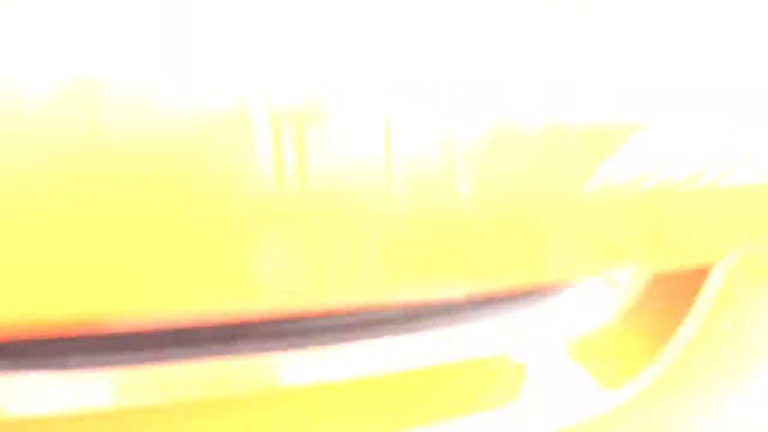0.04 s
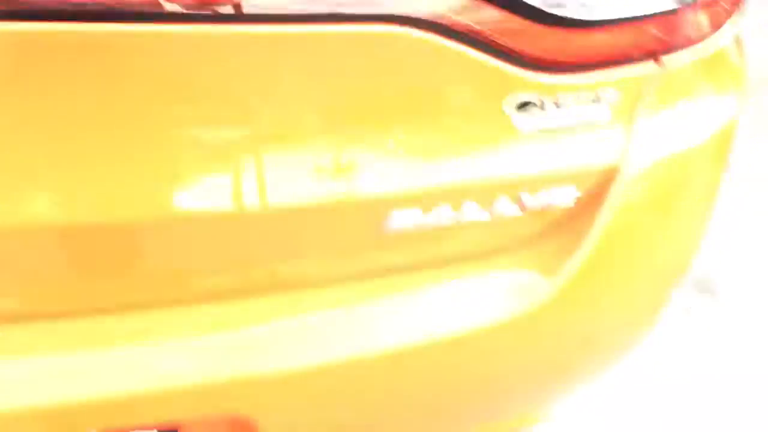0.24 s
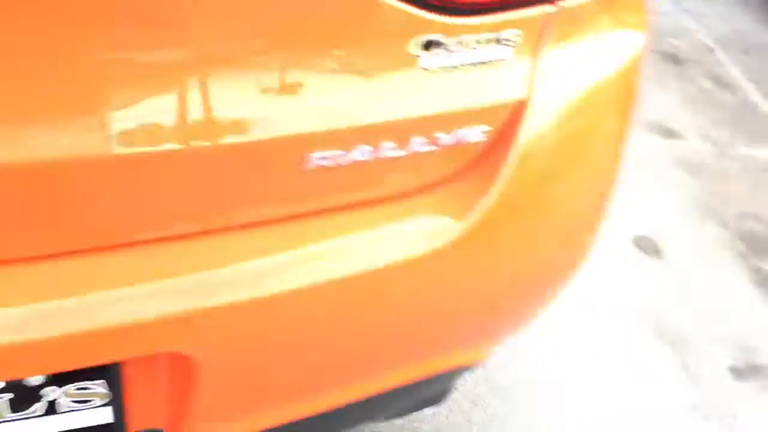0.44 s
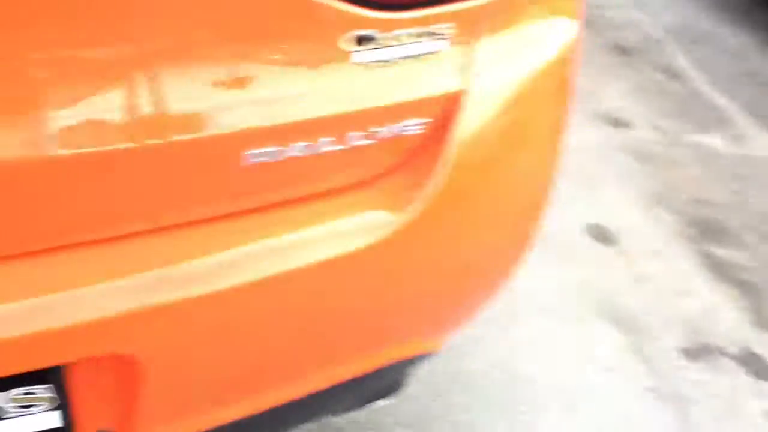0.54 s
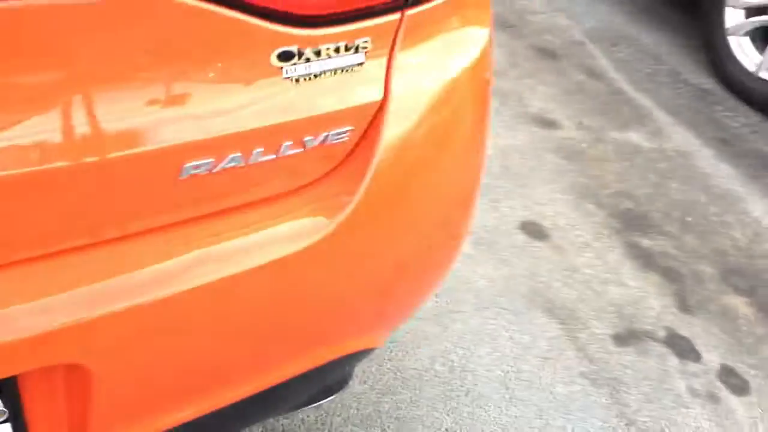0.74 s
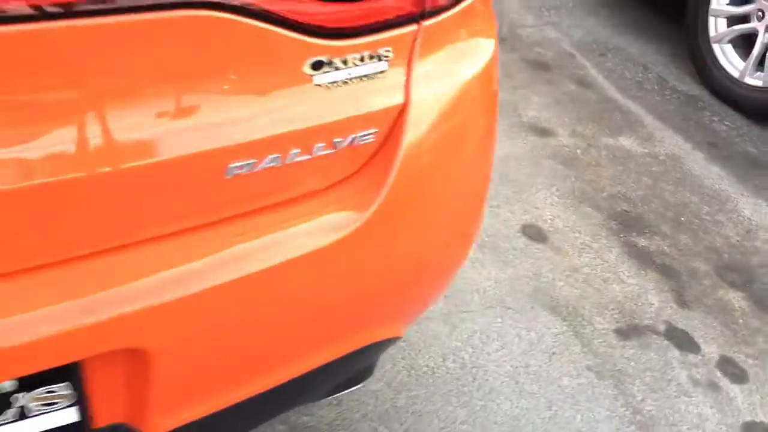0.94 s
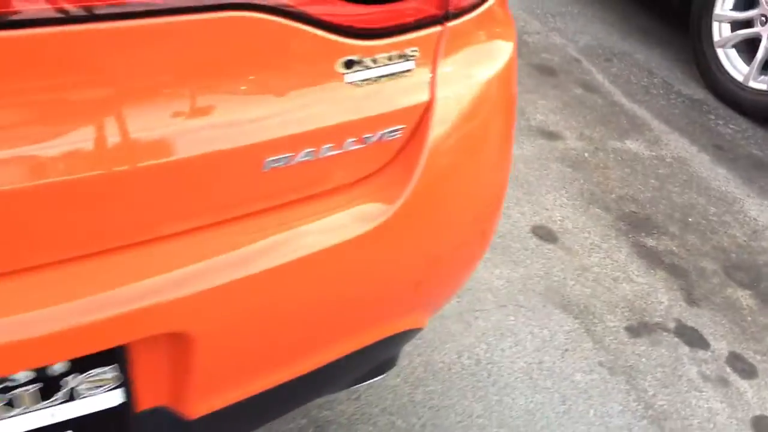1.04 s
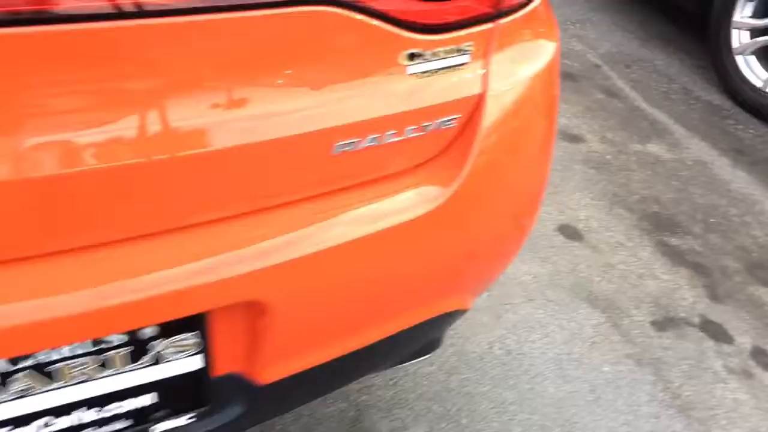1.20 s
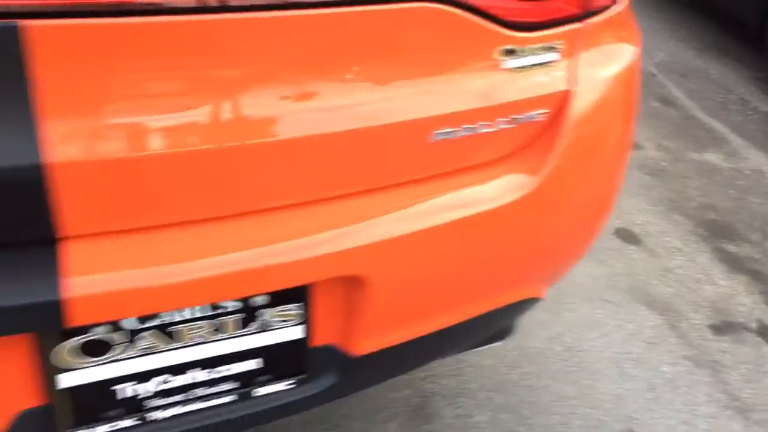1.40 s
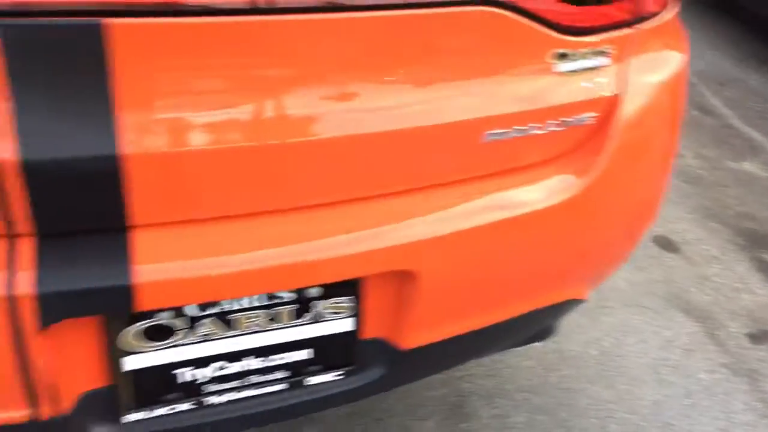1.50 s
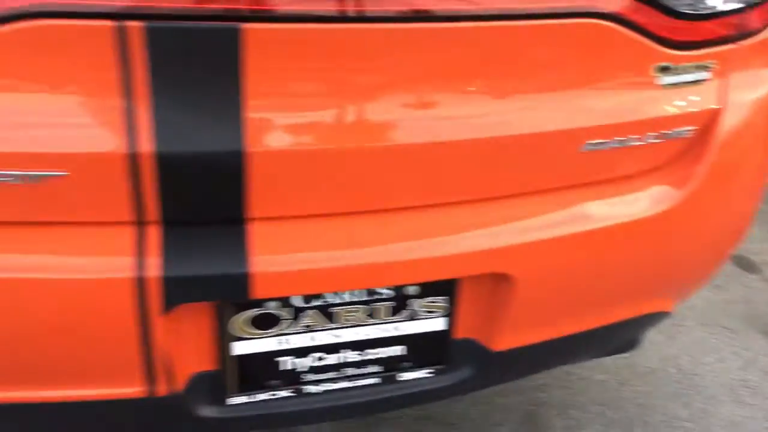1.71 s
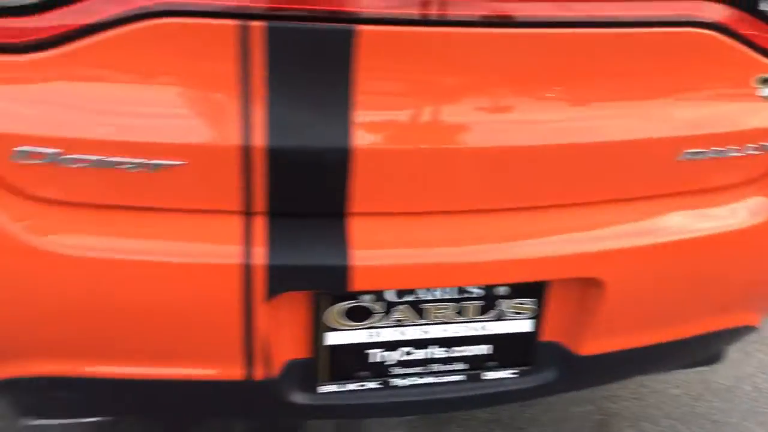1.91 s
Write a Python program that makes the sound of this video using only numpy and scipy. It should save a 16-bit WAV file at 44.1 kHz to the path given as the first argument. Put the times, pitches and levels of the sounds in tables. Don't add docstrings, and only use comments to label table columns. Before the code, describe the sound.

Single close car trunk slam, sharp latch crack and boomy thump, then quiet outdoor engine idle.

```python
import sys
import numpy as np
from scipy import signal
from scipy.fft import rfft, irfft, next_fast_len
from scipy.io import wavfile
from scipy.ndimage import uniform_filter1d

SR = 44100
rng = np.random.default_rng(int(sys.argv[2]) if len(sys.argv) > 2 else 0)


def pcm_store(signal):
    levels = np.round(np.clip(np.atleast_2d(signal), -1, 1) * 32767)
    wavfile.write(sys.argv[1], SR, levels.astype(np.int16).T)


def field_ratio(decibels):
    return 10 ** (np.asarray(decibels, dtype=float) / 20)


N = 85995
T = np.arange(N) / SR


def evened(x):
    return x / np.sqrt(np.mean(x ** 2) + 1e-20)


def coloured(points, x=None):
    if x is None:
        x = rng.standard_normal(N)
    size = next_fast_len(N)
    table_hz, table_db = np.transpose(points)
    hz = np.fft.rfftfreq(size, 1 / SR)
    db = np.interp(np.log(hz + 1), np.log(table_hz + 1), table_db, left=-80)
    return evened(irfft(rfft(x, size) * field_ratio(db), size)[:N])


def resonate(x, hz, width_hz):
    turn = np.exp(2j * np.pi * np.cumsum(hz * np.ones(N)) / SR)
    r = np.exp(-np.pi * width_hz / SR)
    return 2 * (turn * signal.lfilter([1 - r], [1, -r], x / turn)).real


def drift(rate_hz):
    t = T[::32]
    curve = np.zeros(len(t))
    for f in rate_hz * np.geomspace(.05, 1, num=20):
        curve += np.sin(2 * np.pi * (f * t + rng.random())) / np.sqrt(f)
    return np.interp(T, t, evened(curve))


# frequency in Hz, level in dB.
TRAFFIC_SPECTRUM = [(200, 9.5), (300, -1), (600, -3), (1000, 0.5), (2400, -6), (2750, -13), (10500, -33),
                    (15800, -50)]


def traffic():
    hz, t, z = signal.stft(coloured(TRAFFIC_SPECTRUM), SR, nperseg=512)
    patches = uniform_filter1d(rng.standard_normal(z.shape), size=8, axis=0)
    patches = evened(uniform_filter1d(patches, size=14, axis=1))
    roar = signal.istft(z * field_ratio(1.6 * patches), SR, nperseg=512)[1][:N]
    return field_ratio(-47 + 0.34 * drift(rate_hz=3.55)) * roar


# centre in seconds, length in seconds, level in dB, frequency in Hz.
GUST_EVENTS = [(.01, 0.012, -25.5, 64), (0.11, 0.12, -38, 146), (0.494, .04, -30, 42.6),
               (0.596, .07, -29.5, 61.6), (.76, 0.027, -31.5, 47), (1.001, 0.048, -33, 130.5),
               (1.048, 0.026, -32.5, 75), (1.361, 0.031, -25, 51.3), (1.445, 0.018, -29.5, 54.4),
               (1.613, 0.044, -34.5, 59.5), (1.808, 0.091, -35, 94)]


def wind():
    rumble = coloured([(18, 3), (30, 20.5), (70, 6.5), (130, 8), (250, -8), (400, -35.5)])
    out = field_ratio(-44 + 2.3 * drift(rate_hz=17)) * rumble
    for s, length, db, hz in GUST_EVENTS:
        shape = np.exp(-((T - s) / length) ** 2)
        lump = resonate(rng.standard_normal(N), hz, 0.6 * hz)
        lump = shape * resonate(lump, hz, 0.6 * hz)
        out += field_ratio(db) * lump * np.linalg.norm(shape) / np.linalg.norm(lump)
    return out


# time in seconds, base rate in Hz.
IDLE_RATE = [(0, 30.65), (1.3, 30.8), (1.95, 30.35)]
# multiple of the base rate, level in dB.
ENGINE_ORDERS = [(1, -40), (2, -41.5), (3, -47.5), (4, -55), (5, -42.5), (6, -41.5), (7, -55.5), (9, -58),
                 (10, -59.5), (11, -68.5), (15, -59.5)]


def engine():
    waver_db = 1.68
    turns = np.cumsum(np.interp(T, *np.transpose(IDLE_RATE))) / SR
    out = np.zeros(N)
    for order, db in ENGINE_ORDERS:
        level = np.sqrt(2) * field_ratio(db + waver_db * drift(rate_hz=20))
        out += level * np.sin(2 * np.pi * (round(order) * turns + rng.random()))
    return out


# start in seconds, length in seconds, level in dB.
BIRD_CHIRPS = [
    (.85, .045, -61),
    (1.563, .095, -58),
]


def bird():
    top_hz, end_hz, glide_s, width_hz = 4700, 2100, .013, 160
    out = np.zeros(N)
    for s, length, db in BIRD_CHIRPS:
        t = np.clip(T - s, 0, length)
        hz = end_hz + (top_hz - end_hz) * np.exp(-t / glide_s)
        shape = np.minimum(t / .004, 1) * np.sqrt(1 - (t / length) ** 2)
        whistle = np.sin(2 * np.pi * np.cumsum(hz) / SR)
        breath = .7 * evened(resonate(rng.standard_normal(N), hz, width_hz))
        upper = .6 * evened(resonate(rng.standard_normal(N), 1.5 * hz, 2 * width_hz))
        out += field_ratio(db) * shape * (whistle + breath + upper)
    return out


# start in seconds, rise in seconds, fall in seconds, level in dB, brightest Hz.
SHOE_SCUFFS = [
    (.435, 0.0027, .015, -59, 12000),
    (.78, 0.067, 0.046, -59, 11100),
    (.85, 0.026, 0.02, -56, 8150),
    (1.445, 0.0062, .05, -60, 5600),
    (1.555, 0.008, 0.024, -55, 3950),
]


def shoes():
    out = np.zeros(N)
    for s, rise, fall, db, hz in SHOE_SCUFFS:
        shape = np.clip((T - s) / rise, 0, 1) * np.exp(-np.maximum(T - s - rise, 0) / fall)
        out += field_ratio(db) * shape * coloured([(0.083 * hz, -14), (hz, 0), (1.3 * hz, -8), (4 * hz, -34)])
    return out * field_ratio(2.0 * drift(rate_hz=150))


# frequency in Hz, level in dB.
RATTLE_SPECTRUM = [(120, -3), (350, 0.5), (600, 1), (1000, -10), (2000, -13), (4000, -8.5), (9500, -19.5),
                   (15500, -25)]
# frequency in Hz, width in Hz, level in dB.
TRIM_RINGS = [(4000, 270, 1.5), (5850, 150, 3), (9400, 350, 2.5)]


def trim():
    start_s, end_s, stop_s = .205, 0.345, 0.049
    start_db, fall_db_per_s, ticks_per_s = -25, -110, 1500
    ticks = field_ratio(1.9 * np.minimum(rng.exponential(1, N), 4)) * (rng.random(N) < ticks_per_s / SR)
    tick_shape = signal.fftconvolve(ticks, np.exp(-T[:400] / 0.0055))[:N]
    grains = evened(tick_shape * rng.standard_normal(N))
    ring = np.zeros(N)
    for hz, width_hz, db in TRIM_RINGS:
        ring += field_ratio(db) * evened(resonate(grains, hz, width_hz))
    level_db = start_db + fall_db_per_s * (T - start_s)
    level_db -= 20 * np.maximum(T - end_s, 0) / stop_s
    return (T > start_s) * field_ratio(level_db) * (coloured(RATTLE_SPECTRUM, grains) + 0.15 * ring)


# start in seconds, frequency in Hz, level in dB, swell in seconds.
BODY_RINGS = [(.2062, 62.2, -2.5, 0.018), (.27, 72, -14.5, 0.0335), (.328, 63, -19.5, .022),
              (0.19, 110, -11.5, 0.042), (.30, 106.6, -16.5, 0.022), (.20, 155, -13, 0.027),
              (.2555, 150, -7, 0.02), (.2, 178, -12, 0.023), (.2, 298, -13.5, 0.026),
              (.235, 590, -19, 0.018), (.305, 152.5, -24, 0.03), (.196, 187, -9.5, 0.015),
              (.225, 205, -6, 0.021), (.27, 225, -18, .03), (.205, 270, -6.5, 0.0255),
              (.255, 230, -13.5, 0.021), (.198, 325, -9, 0.0137), (.25, 335, -17.5, 0.027),
              (.27, 308, -33, .07), (.30, 200, -24, .025), (.225, 375, -16, 0.02), (0.25, 410, -26, 0.025),
              (.202, 545, -16, 0.011), (.232, 545, -12, 0.013), (0.23, 560, -26, 0.014),
              (.198, 850, -18, 0.016), (.23, 760, -16.5, .014), (.2, 1320, -21, .01),
              (.205, 1520, -25, 0.02)]


def body():
    out = np.zeros(N)
    for s, hz, db, swell in BODY_RINGS:
        u = np.maximum(T - s, 0) / swell
        out += field_ratio(db) * (u * np.exp(1 - u)) ** 3 * np.sin(2 * np.pi * hz * (T - s))
    return out


# time in seconds, knock in dB, crack in dB.
LID_CONTACTS = [(0.1958, -12, -12), (.198, -10, -4), (.201, -13, 0), (0.2037, 2.5, -7), (0.2086, 3.5, 6),
                (0.213, -1, 2), (0.2178, 1, -4), (.2225, 8, -4), (0.2289, -3, 4), (.230, -12, -12),
                (0.24, -2, -2), (0.244, 2, 0), (.250, 0, -6.5), (.258, -4, -12), (0.27, -7, -14),
                (0.276, -14, -15), (0.294, -11, -20), (.300, -27, -20), (0.318, -31, -20),
                (0.333, -26, -25)]


def strikes(column, t60):
    power = np.zeros(N)
    for row in LID_CONTACTS:
        power[round(row[0] * SR)] = field_ratio(2 * row[column])
    power = signal.fftconvolve(power, field_ratio(-120 * T[:SR // 4] / t60))[:N]
    return np.sqrt(abs(power)) * (T >= LID_CONTACTS[0][0])


# frequency in Hz, level in dB per Hz.
KNOCK_SPECTRUM = [(300, -18), (500, 1.5), (900, -0.5), (1700, -3), (2400, -7), (3000, -16), (5000, -33.5)]
# frequency in Hz, level in dB per Hz.
CRACK_SPECTRUM = [(1500, 7.5), (2500, 1), (4000, -1), (6500, -2.5), (9000, -6), (13000, -10),
                  (15500, -11.5)]


def lid():
    knock = field_ratio(-12.5) * strikes(column=1, t60=0.036) * coloured(KNOCK_SPECTRUM)
    crack = field_ratio(-18) * strikes(column=2, t60=.03) * coloured(CRACK_SPECTRUM)
    return knock + crack


def yard(x):
    t = T[:SR // 2]
    dull_noise = signal.lfilter([.3], [1, -.7], rng.standard_normal(SR // 2))
    tail = dull_noise * field_ratio(-60 * t / 0.23) * (t > .004)
    return field_ratio(-15.5) * signal.fftconvolve(x, tail / np.linalg.norm(tail))[:N]


def scene():
    background = traffic() + wind() + engine() + bird() + shoes()
    slam = lid() + body() + trim()
    return (slam + yard(slam) + background)[None]


def band_limit(x):
    return signal.sosfilt(signal.butter(12, 16300, fs=SR, output="sos"), x)


def record(dry):
    knee_db, duck, recover_db_per_s, grip_s, ceiling = -23, 0.43, 48, 0.021, .68
    power_db = 10 * np.log10(abs(uniform_filter1d(dry[0] ** 2, size=1500, origin=700)) + 1e-12)
    fall = T * recover_db_per_s
    held_db = np.maximum.accumulate(power_db + fall) - fall
    over_db = np.maximum(held_db - knee_db, 0)
    grip = 1 / (grip_s * SR)
    ducked = dry / field_ratio(duck * signal.lfilter([grip], [1, grip - 1], over_db))
    hiss = field_ratio(-65) * coloured([(1000, 5), (6000, -7), (15800, -23)])
    out = ceiling * np.tanh(ducked / ceiling) + hiss
    out = signal.sosfilt(signal.butter(2, 22, 'high', fs=SR, output='sos'), out)
    lowpass = signal.firwin(401, 15800, window=('kaiser', 9), fs=SR)
    out = signal.oaconvolve(out, lowpass[None], 'same')
    return band_limit(out)


dry = scene()
out = record(dry)
pcm_store(out)
```